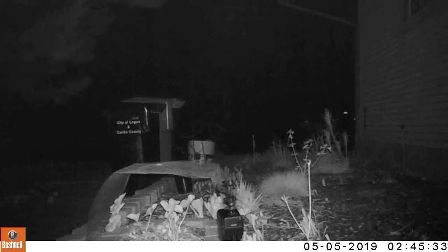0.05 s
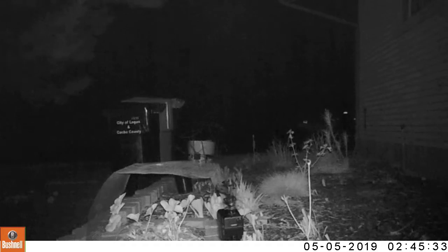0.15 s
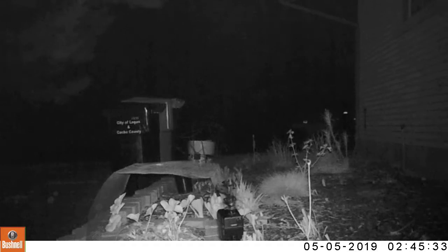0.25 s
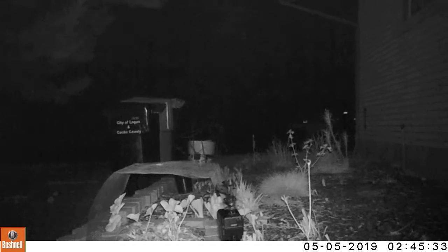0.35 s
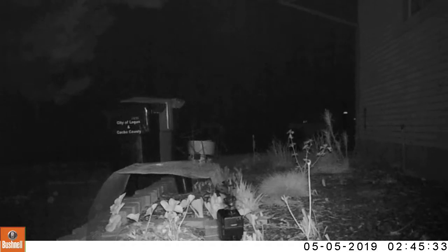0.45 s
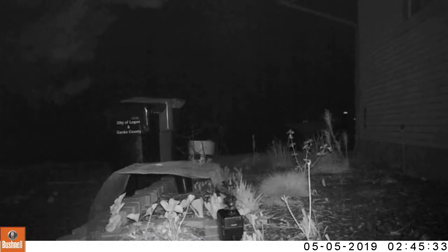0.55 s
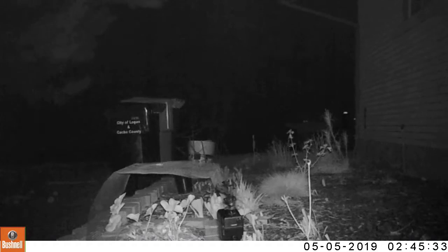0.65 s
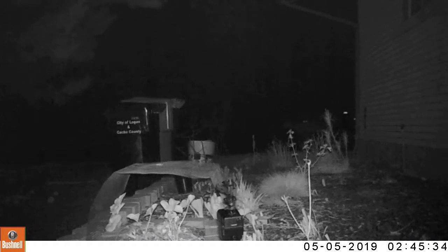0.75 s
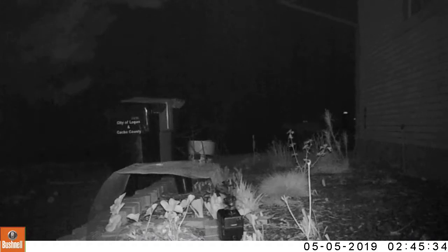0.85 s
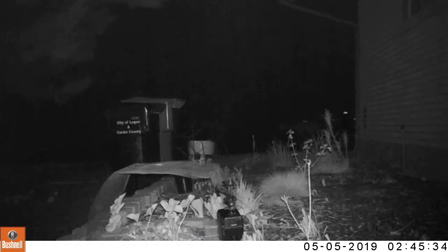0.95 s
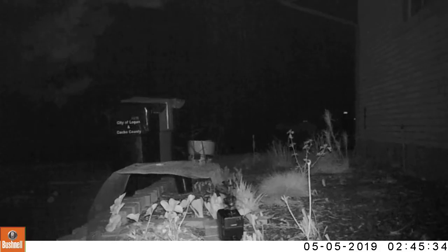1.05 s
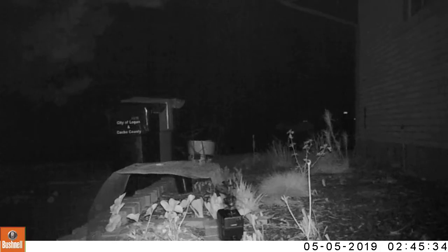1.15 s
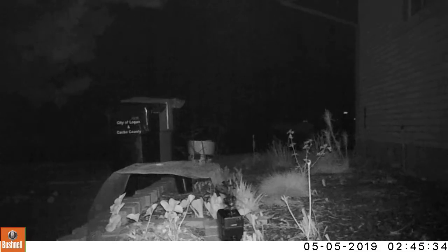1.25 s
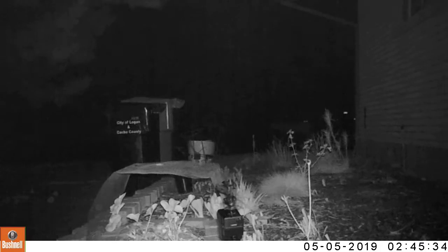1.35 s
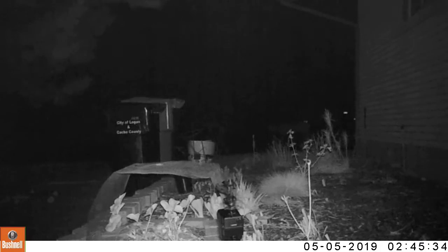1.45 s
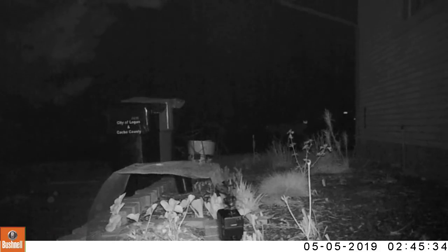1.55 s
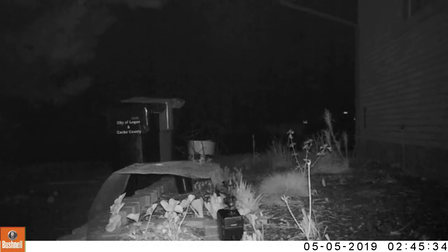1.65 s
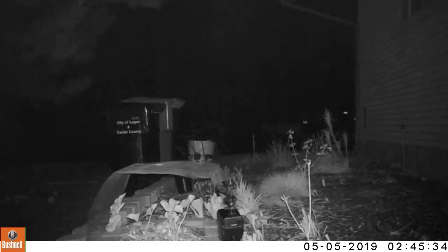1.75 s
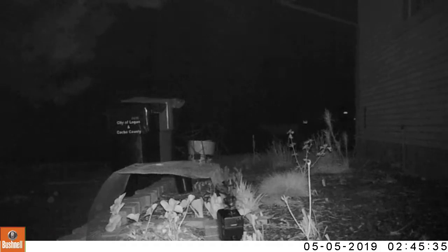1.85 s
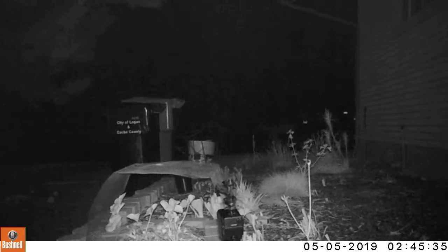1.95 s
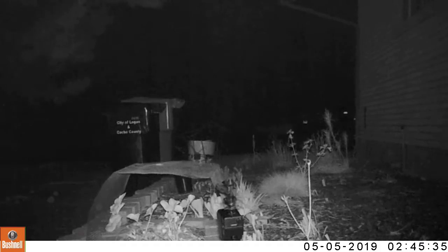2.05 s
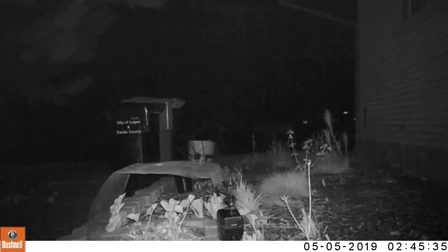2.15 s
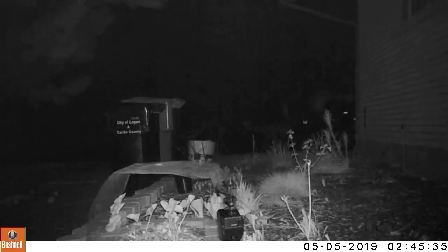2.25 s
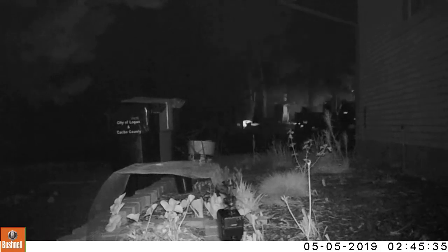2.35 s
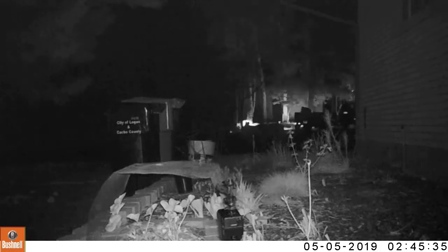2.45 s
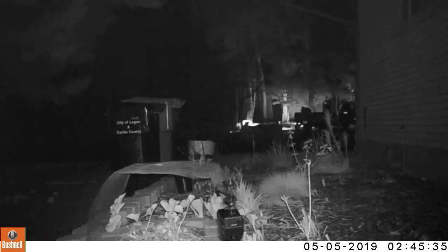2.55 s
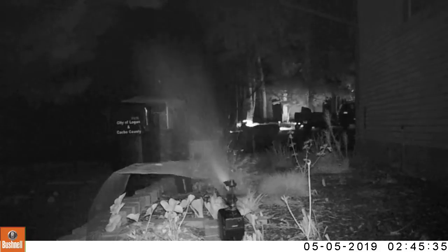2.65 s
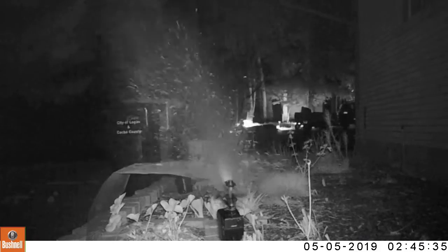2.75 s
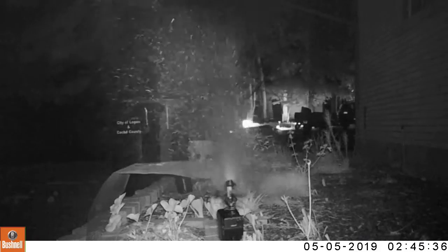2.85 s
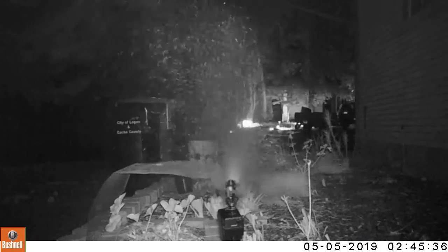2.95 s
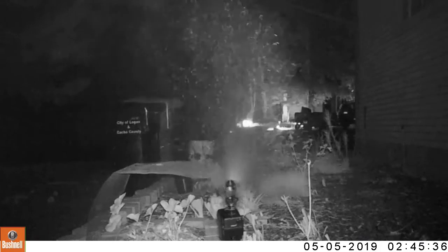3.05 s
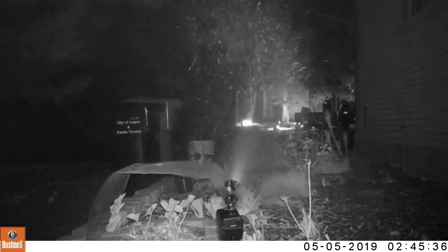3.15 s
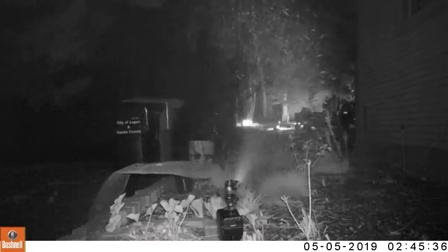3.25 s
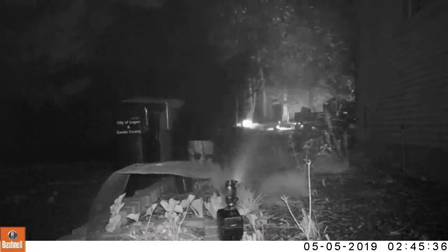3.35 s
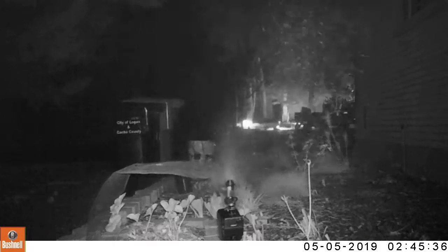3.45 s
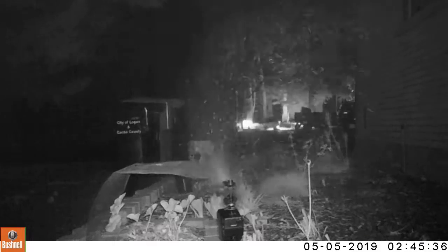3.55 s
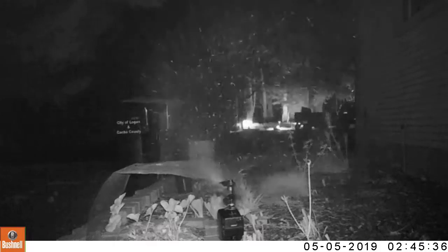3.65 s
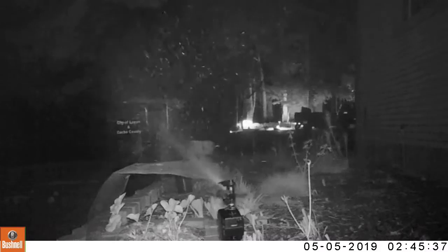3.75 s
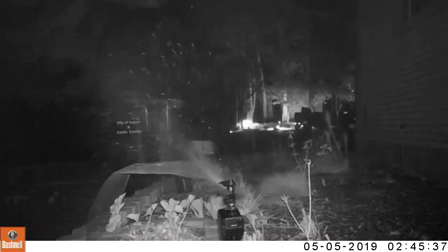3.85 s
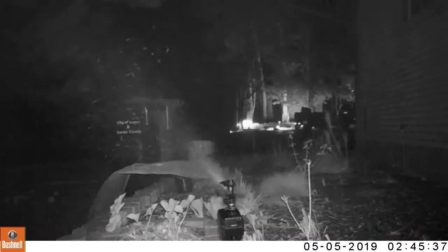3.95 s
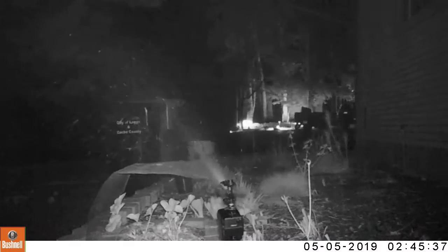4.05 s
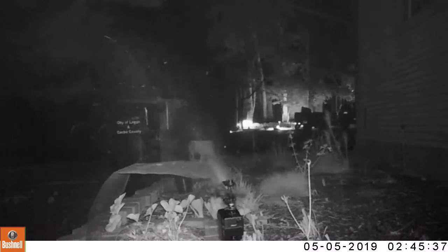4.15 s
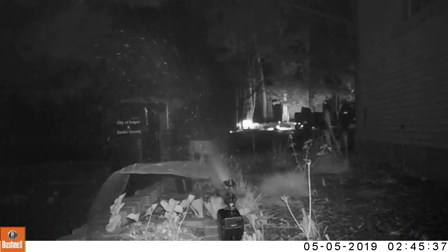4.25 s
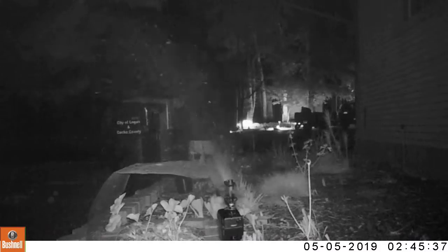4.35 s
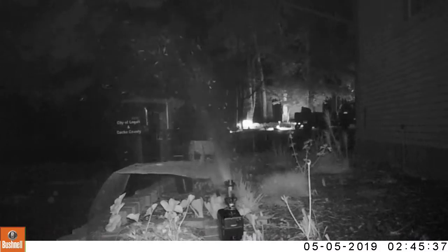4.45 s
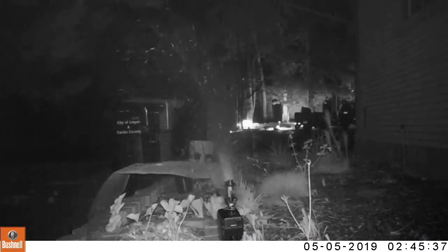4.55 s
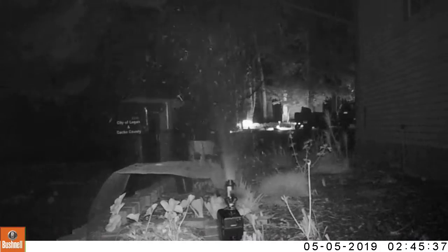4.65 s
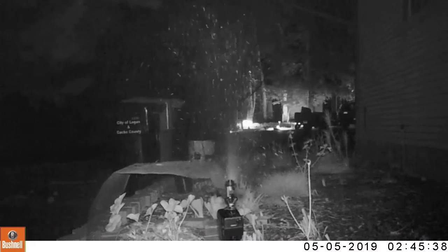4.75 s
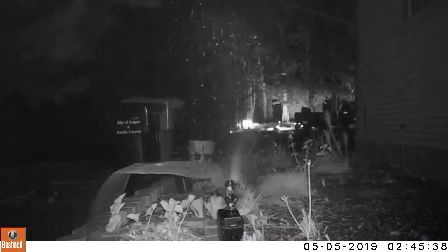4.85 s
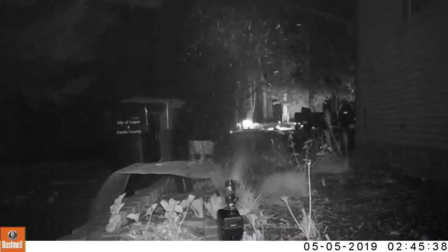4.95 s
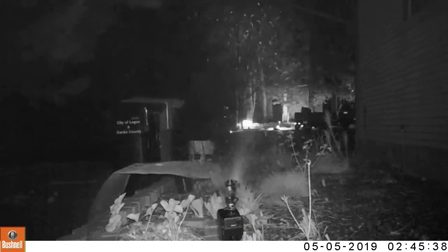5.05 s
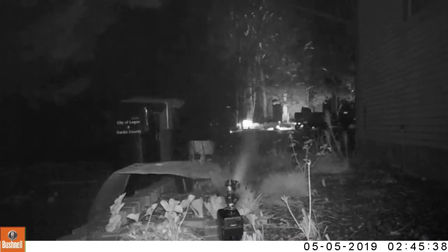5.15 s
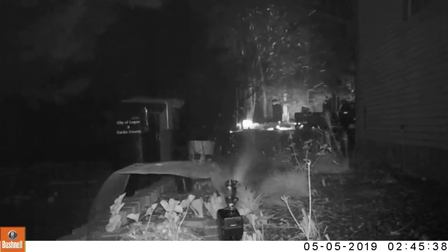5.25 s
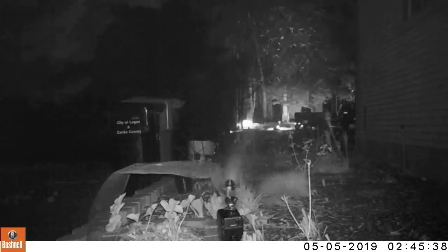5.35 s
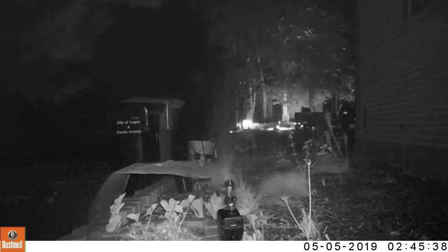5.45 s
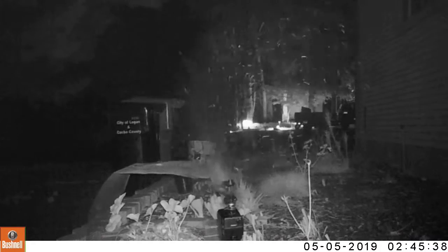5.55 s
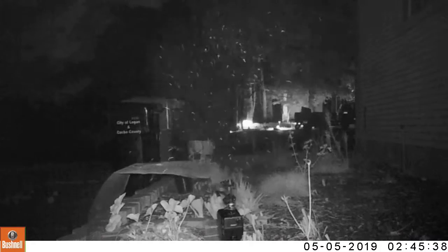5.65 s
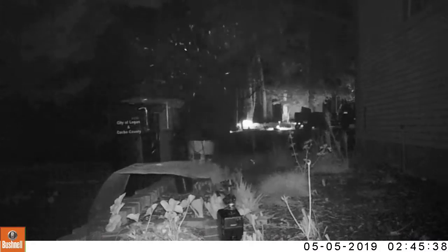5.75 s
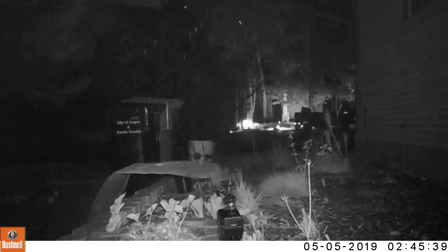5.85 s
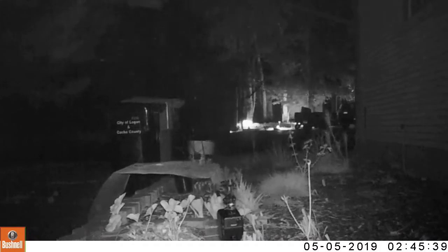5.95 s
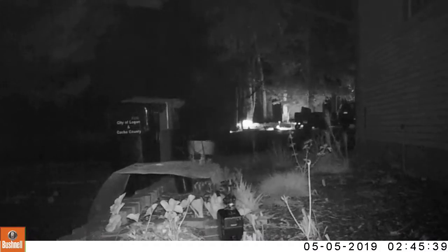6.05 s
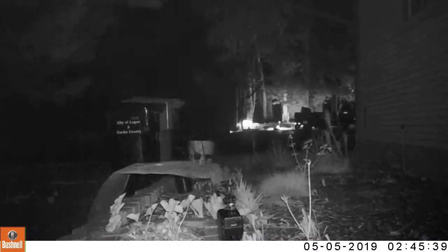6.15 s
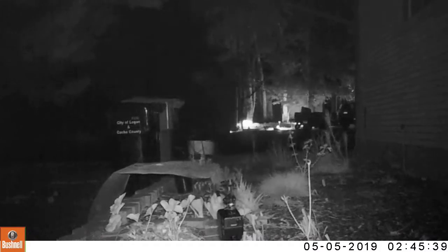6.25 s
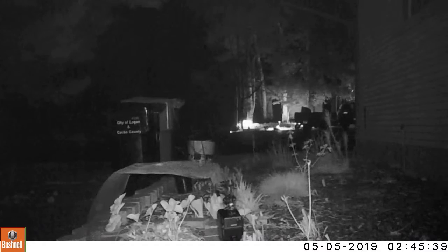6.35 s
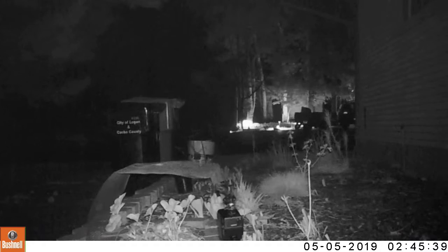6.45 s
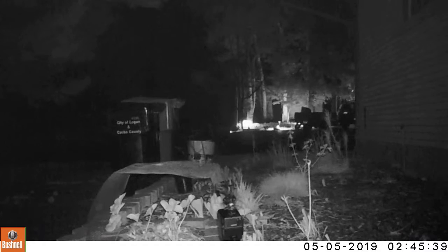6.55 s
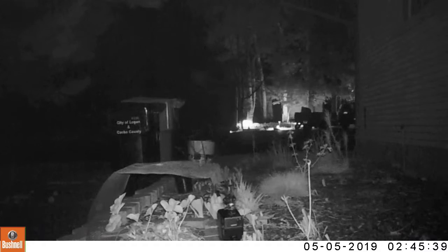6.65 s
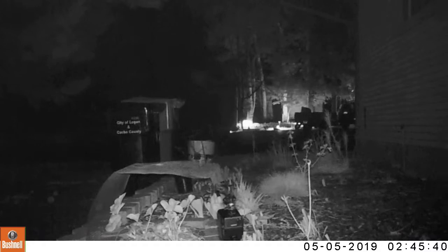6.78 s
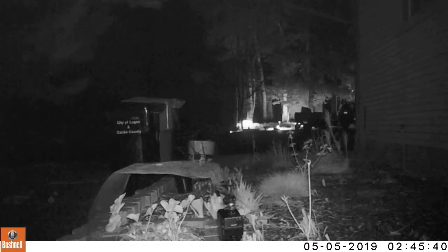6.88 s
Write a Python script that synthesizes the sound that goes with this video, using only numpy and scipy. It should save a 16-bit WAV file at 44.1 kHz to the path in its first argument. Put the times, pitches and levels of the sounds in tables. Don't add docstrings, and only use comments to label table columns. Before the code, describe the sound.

Nearly three seconds of soft low rumble come first, through a modest outdoor camera microphone. Then an impact sprinkler starts close by with a snap and spit: a strong rushing hiss with hard, rattly plastic knocks and wet splashes in steady rapid rhythm. It flutters quickly without knocks as the head swings back, ticks through a longer, softer sweep, flutters again and cuts off sharply. Faint droplets patter on leaves and soil, with short reflections from the wall.

```python
import sys
import numpy as np
from scipy import signal
from scipy.io import wavfile
from scipy.ndimage import uniform_filter1d

SR = 44100
rng = np.random.default_rng(int(sys.argv[2]) if len(sys.argv) > 2 else 0)


def level_to_linear(level):
    exponent = np.asarray(level, float) / 20
    return 10 ** exponent


def generate_wav(signal):
    frames = np.transpose(np.atleast_2d(signal))
    scaled = np.clip(frames, -1, 1) * 32767
    pcm = np.round(scaled).astype(np.int16)
    wavfile.write(sys.argv[1], SR, pcm)


N = 305127
CLOCK = np.arange(N) / SR

# (frequency [Hz], level [dB per Hz])
JET_COLOUR = [(150, -25.5), (250, -15), (465, -8.5), (600, -14.5), (900, -16.5), (1300, -10.5), (1800, -7),
              (2550, -7.5), (3150, -8), (3900, -6), (5000, -3.5), (5800, 0), (6400, -10.5), (11500, -17.5)]
# (frequency [Hz], width [Hz], level [dB])
NOZZLE_TONES = [(467, 60, -6.5), (695, 55, -4.5), (3290, 32, 2.5), (3830, 110, 1), (4340, 92, -1),
                (5340, 200, -4.5)]
# (time [s], jet level [dB])
PRESSURE = [
    (2.70, -42.5),
    (2.74, -39),
    (2.90, -39),
    (3.15, -41),
    (3.55, -43),
    (3.84, -43),
    (4.07, -46),
    (4.9, -47.5),
    (5.72, -47.5),
]
# (time [s], aim [0 = away from the wall, 1 = at the wall])
AIM = [
    (2.68, 0.53),
    (3.48, 1),
    (3.95, .05),
    (4.07, .02),
    (5.38, 0.78),
    (5.75, 0.84),
]
# (time [s], knock peak [dB], splash [dB], rebound against the knock [dB])
STRIKES = [(2.8178, -23.5, -42.5, -2), (2.9527, -26, -44, -0.5), (3.0791, -29.5, -42.5, 2),
           (3.2051, -26, -43, 1.5), (3.3266, -29.5, -41.5, 2.5), (3.466, -26, -41, -2.5),
           (3.9818, -31.5, -42, 3.5), (4.1081, -27.5, -43, -2.5), (4.2321, -26, -42, -3.5),
           (4.3568, -28.5, -44, -5), (4.481, -28, -45, -4), (4.6073, -26, -43.5, -8),
           (4.7318, -27.5, -45.5, 0), (4.857, -27.5, -45.5, -1.5), (4.9809, -32, -47, 4),
           (5.1051, -29, -44.5, -0.5), (5.2307, -28.5, -45, 0.5), (5.3548, -26, -46, -0.5)]
# (time [s], splash [dB])
CHOPS = [(3.4994, -44.5), (3.5394, -42), (3.5844, -43.5), (3.63, -42), (3.6765, -41), (3.7184, -41.5),
         (3.7688, -43), (3.812, -41.5), (3.8574, -46), (5.4121, -44), (5.466, -43.5), (5.5185, -42.5),
         (5.5692, -44.5), (5.6164, -43.5), (5.67, -42), (5.7244, -44)]
# (frequency [Hz], level [dB per Hz])
SPLASH_COLOUR = [(300, -17), (1000, -14), (2000, -11.5), (3200, -13), (4000, -11), (5000, -4.5),
                 (5700, 4.5), (6300, -1.5), (8000, -4), (10000, -11.5), (12000, -9)]
# (frequency [Hz], level [dB], time to fall 60 dB [s])
HEAD_MODES = [(482, -19.5, .05), (707, -18.5, 0.063), (1820, -9, 0.023), (2600, -7, 0.017),
              (3910, -4.5, 0.054), (4110, -2, 0.046), (4440, -6.5, 0.045), (4660, -7, .045),
              (4930, -9.5, 0.039), (5320, -8, .044), (5720, -7, 0.018), (6130, -5, 0.02),
              (7100, -10, 0.013)]
# (time after the blow [s], level [dB], hardness [0-1])
BOUNCES = [
    (0, -3.5, 0.86),
    (.0065, -4, 0.3),
    (.013, -4, 0.29),
    (.029, -10.5, .5),
]
# (time [s], peak [dB], frequency [Hz], crack [0-1])
VALVE_CLICKS = [
    (2.6809, -41, 3300, 1),
    (2.6917, -33, 5700, .3),
]
# (frequency [Hz], width [Hz], level [dB])
DRAIN_TONES = [(4010, 450, -56), (2670, 550, -64)]
# (time [s], patter [dB])
PATTER = [
    (5.78, -74),
    (5.85, -67.5),
    (6.08, -70.5),
    (6.18, -67.5),
    (6.55, -68),
    (6.63, -73),
    (6.92, -83),
]
# (frequency [Hz], level [dB per Hz])
LEAF_COLOUR = [(470, -30), (800, -1), (1110, -8), (2450, -4.5), (3290, -7), (4990, -2.5), (5630, -3.5),
               (7740, -16.5), (11000, -24), (14300, -49), (22000, -120)]
# (time [s], peak [dB], centre [Hz], width [Hz], length [s])
DRIPS = [(5.948, -59, 4170, 2600, 0.0073), (6.014, -67, 7000, 3000, .002), (6.171, -64, 5100, 2000, .006),
         (6.183, -58, 7000, 4500, 0.0027), (6.222, -50, 2600, 4200, 0.0045), (6.244, -59, 2700, 2500, .003),
         (6.295, -65, 2500, 2500, 0.0045), (6.348, -65, 4000, 4000, 0.0031),
         (6.41, -60, 3000, 4000, 0.0033), (6.49, -66, 3900, 1500, .006), (6.536, -58, 4000, 6000, .004),
         (6.575, -65, 4000, 4000, .003)]
# (frequency [Hz], level [dB per Hz])
NIGHT_COLOUR = [(4.7, -36.5), (8.0, -0.5), (27, -2.5), (43, -8), (141, -13.5), (211, -18.5), (254, -20),
                (537, -28.5), (628, -30), (689, -31), (781, -33), (2630, -44.5), (13700, -55)]
# (frequency [Hz], gain [dB])
TOP_STEPS = [(8100, 0), (8700, -8), (9300, -6), (10600, -6), (11000, -13), (11500, -11), (12600, -13),
             (13300, -11)]


def evened(x):
    return x / np.sqrt(np.mean(x ** 2) + 1e-20)


def read(points, hz):
    f, value = np.transpose(points)
    return np.interp(np.log(hz + 1), np.log(f + 1), value)


def add(mix, s, sound):
    part = mix[round(s * SR):][:len(sound)]
    part += sound[:len(part)]


def coloured(x, points, size=4096):
    gain_db = np.maximum(read(points, abs(np.fft.fftfreq(size, 1 / SR))), -100)
    log_gain = np.log(level_to_linear(gain_db))
    response = np.fft.ifft(np.exp(np.conj(signal.hilbert(log_gain)))).real
    return signal.oaconvolve(x, response / np.linalg.norm(response))[:len(x)]


def resonate(x, hz, width):
    return signal.lfilter(*signal.iirpeak(hz, hz / width, SR), x)


def resonate_twice(x, hz, width):
    return resonate(resonate(x, hz, width), hz, width)


def filtered(x, order, hz, kind="low"):
    return signal.sosfilt(signal.butter(order, hz, kind, fs=SR, output="sos"), x)


def drops(per_s, spread_db, wash):
    size = level_to_linear(spread_db * np.minimum(rng.exponential(1, N), 5))
    clicks = size * (rng.random(N) < per_s / SR) * rng.choice([-1, 1], N)
    return evened(evened(clicks) + wash * rng.standard_normal(N))


def flutter(slow_hz):
    lowpass = signal.butter(2, slow_hz, fs=SR, output="sos")
    return evened(signal.sosfiltfilt(lowpass, rng.standard_normal(N)))


def jet():
    level, gurgle, mist, roar = flow()
    wavering_db = 0.7 * flutter(slow_hz=127) + 0.58 * flutter(slow_hz=20)
    spray = drops(per_s=6000, spread_db=1.5, wash=0.87) * level_to_linear(wavering_db)
    hiss = coloured(spray, JET_COLOUR)
    hiss = hiss + swept(hiss) + sum(level_to_linear(db) * resonate(hiss, hz, width) for hz, width, db in NOZZLE_TONES)
    low = filtered(hiss, 2, 1500)
    top = filtered(hiss, 3, 6800, "high")
    air = resonate_twice(drops(per_s=4000, spread_db=0.5, wash=1.0), hz=4350, width=3300)
    middle = hiss - low - top
    mix = evened(middle) + gurgle * evened(low) + mist * evened(top) + roar * evened(air)
    return mix * level


def flow():
    open_s, fill_s, shut_s = 2.6813, 2.691, 5.735
    spit_db, spit_fall_db = -43.5, -8.5
    since = np.maximum(CLOCK - open_s, 0)
    aim = np.interp(CLOCK, *np.transpose(AIM))
    s, db = np.transpose(PRESSURE)
    early_db = spit_db + spit_fall_db * since / (fill_s - open_s)
    later_db = np.interp(CLOCK, [fill_s, *s], [spit_db + spit_fall_db, *db])
    level_db = np.where(CLOCK < fill_s, early_db, later_db)
    shut = np.maximum(CLOCK - shut_s, 0)
    level_db = level_db - 330 * shut ** 2 / (shut + 0.037)
    slack = np.maximum(np.interp(CLOCK, [fill_s, s[0]], [1, 0]), np.clip(shut / 0.1, 0, 1))
    air = (1 - np.exp(-since / 0.06)) * np.exp(-since / 0.92)
    airy = np.exp(-since / 0.25) * (1 - slack)
    gurgle_db = -16 + 4 * aim + 12.5 * slack
    mist_db = -9 - 2.5 * aim - 15 * airy
    roar_db = -21 + 13.5 * aim + 6.5 * np.maximum(air, slack)
    return level_to_linear(level_db) * (CLOCK >= open_s), level_to_linear(gurgle_db), level_to_linear(mist_db), level_to_linear(roar_db)


def swept(x):
    width_hz, level_db = 280, -2
    hz = 2500 + 350 * np.interp(CLOCK, *np.transpose(AIM)) ** 2
    turn = np.exp(2j * np.pi * np.cumsum(hz) / SR)
    r = np.exp(-np.pi * width_hz / SR)
    smooth = signal.lfilter([1 - r], [1, -r], x / turn)
    return level_to_linear(level_db) * 2 * (turn * smooth).real


def splashes(rows, lead, rise, t60, boost_db):
    t, swell = np.arange(4000) / SR, np.zeros(N)
    for s, splash_db in rows:
        fade = level_to_linear(splash_db + boost_db - 60 * t / t60)
        add(swell, s - lead, fade * (1 - np.exp(-(t / rise) ** 2)))
    return swell * coloured(drops(per_s=5000, spread_db=3.5, wash=0.77), SPLASH_COLOUR)


def knocks():
    t, out = np.arange(3000) / SR, np.zeros(N)
    hz, mode_db, t60 = np.transpose(HEAD_MODES)[:, :, None]
    brief = t60 < 0.04
    cushion = 1 - np.exp(-(t / 0.0007) ** 2)
    cushion = cushion * (1 + level_to_linear(5.5) * np.exp(-(t / 0.0027) ** 2))
    chance = rng.standard_normal((len(STRIKES), len(BOUNCES), 1 + 3 * len(HEAD_MODES)))
    for (s, blow_db, _, rebound_db), rows in zip(STRIKES, chance):
        for (late, db, hard), row in zip(BOUNCES, rows):
            vary_db, detune, phase = row[1::3, None], row[2::3, None], row[3::3, None]
            share_db = mode_db + 1.8 * vary_db + np.where(brief, -12 * (1 - hard), -7 * hard)
            tone = np.sin(2 * np.pi * hz * (1 + 0.011 * detune) * t + phase)
            ring = level_to_linear(share_db - 60 * t / t60) * tone
            peak_db = blow_db + db - 11 + rebound_db * (late > 0)
            add(out, s + late * (1 + 0.05 * row[0]), level_to_linear(peak_db) * cushion * ring.sum(0))
    return out


def valve():
    t, out = np.arange(900) / SR, np.zeros(N)
    noises = rng.standard_normal((len(VALVE_CLICKS), len(t)))
    for (s, peak_db, hz, crack), noise in zip(VALVE_CLICKS, noises):
        ring = np.sin(2 * np.pi * hz * t) * np.exp(-t / 0.0012)
        add(out, s, level_to_linear(peak_db) * (ring + crack * noise * np.exp(-t / 0.001)))
    return out


def drain():
    fade_db = np.interp(CLOCK, [5.76, 5.785, 5.825, 5.87], [-38, 1, -11, -26], left=-150, right=-150)
    sputter = drops(per_s=530, spread_db=2.0, wash=0.9)
    whistles = sum(level_to_linear(db) * evened(resonate_twice(sputter, hz, width)) for hz, width, db in DRAIN_TONES)
    return level_to_linear(fade_db) * whistles


def wall(x):
    t = np.arange(6000) / SR
    sparse = rng.standard_normal(len(t)) * (rng.random(len(t)) < 0.05)
    tail = sparse * level_to_linear(-60 * t / 0.098) * (t > 0.003)
    return signal.oaconvolve(x, tail / np.linalg.norm(tail))[:N]


def patter():
    s, level_db = np.transpose(PATTER)
    level = level_to_linear(np.interp(CLOCK, s, level_db, left=-150) + flutter(slow_hz=40))
    dulled = filtered(level_to_linear(-0.5) * taps(), 3, 7400)
    return level * coloured(drops(per_s=1500, spread_db=2.0, wash=1.0), LEAF_COLOUR) + dulled


def taps():
    t, out = np.arange(1500) / SR, np.zeros(N)
    noises = rng.standard_normal((len(DRIPS), len(t)))
    for (s, peak_db, hz, width, length), noise in zip(DRIPS, noises):
        puff = evened(resonate_twice(noise, hz, width)) * np.exp(-t / length)
        add(out, s, level_to_linear(peak_db) * puff)
    return out


def night():
    return level_to_linear(-52) * evened(coloured(rng.standard_normal(N), NIGHT_COLOUR, size=16384))


def starved(x, step_db, first=390, count=264, size=1024):
    n, k = np.arange(2 * size), first + np.arange(count)
    window = np.sin(np.pi * (n + 0.5) / (2 * size))
    basis = window[:, None] * np.cos(np.pi / size * np.outer(n + 0.5 + size / 2, k + 0.5))
    padded = np.pad(x, (size, 2 * size - N % size))
    lines = np.lib.stride_tricks.sliding_window_view(padded, 2 * size)[::size].copy() @ basis
    share_db = np.repeat(1.5 * rng.standard_normal((len(lines), count // 24)), 24, axis=1)
    nearby = np.sqrt(uniform_filter1d(lines ** 2, size=70, axis=1) + 1e-20)
    loudness = nearby.mean(1)
    quiet = loudness < 1.3 * np.median(loudness[:100])
    spare_db = np.outer(quiet, np.linspace(5, 0, count))
    step = level_to_linear(step_db + share_db - spare_db) * nearby
    steady = loudness < 3 * np.roll(loudness, 2)
    rounding = step * np.round(lines / step) - lines
    error = steady[:, None] * rounding @ basis.T * 2 / size
    return x + (error[1:, :size] + error[:-1, size:]).ravel()[:N]


def scene():
    slow_rows = np.array(STRIKES)[:, ::2]
    arm = splashes(slow_rows, lead=0.004, rise=0.0046, t60=0.098, boost_db=5)
    arm = arm + splashes(CHOPS, lead=0.004, rise=0.0065, t60=0.1, boost_db=5)
    near = jet() + arm + knocks() + valve() + drain()
    heard = coloured(near + level_to_linear(-12) * wall(near), TOP_STEPS)
    return (heard + patter() + night())[None]


def top_cut(x):
    return signal.sosfilt(signal.butter(12, 15680, fs=SR, output="sos"), x)


def record(dry):
    thin = starved(dry[0], step_db=8.5)[None]
    band_limit = signal.firwin(401, 13900, window=("kaiser", 2.5), fs=SR)[None]
    limited = signal.oaconvolve(thin, band_limit, "same")
    return top_cut(limited)


dry = scene()
out = record(dry)
generate_wav(out)
```